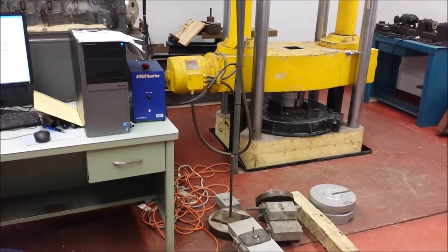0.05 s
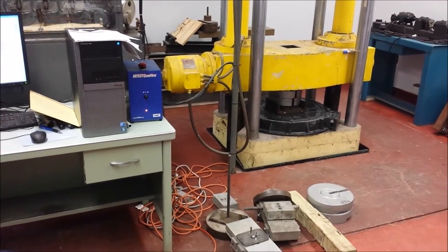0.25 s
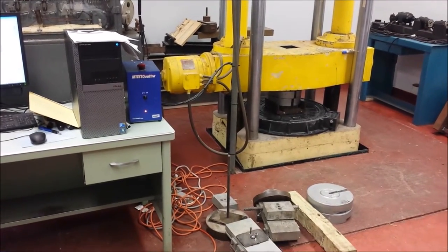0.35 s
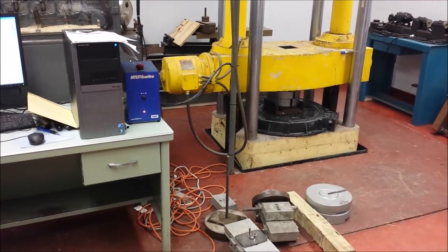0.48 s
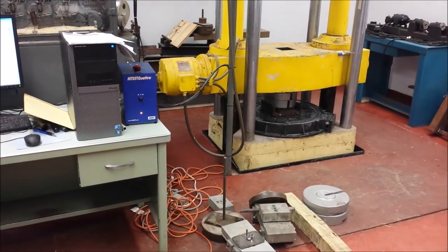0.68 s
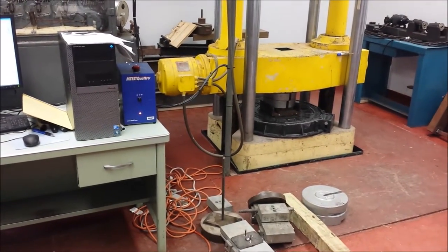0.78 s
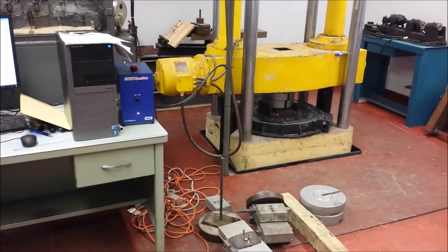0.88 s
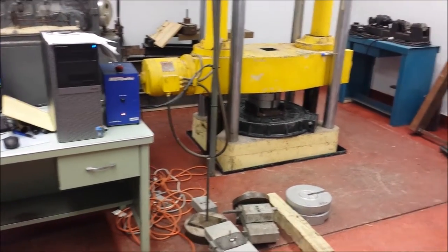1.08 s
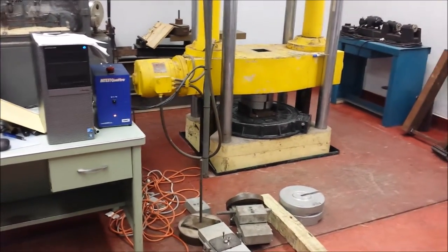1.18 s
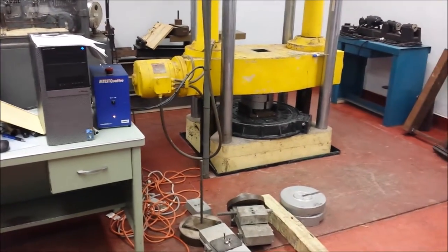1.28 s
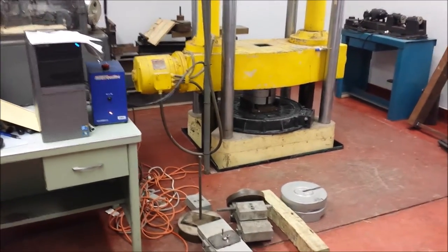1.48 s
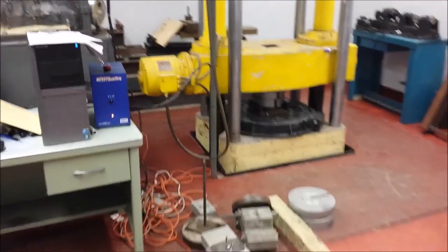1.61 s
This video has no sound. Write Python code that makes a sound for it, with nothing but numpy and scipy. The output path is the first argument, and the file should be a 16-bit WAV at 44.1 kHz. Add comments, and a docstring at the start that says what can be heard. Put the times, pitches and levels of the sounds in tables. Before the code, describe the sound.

One loud, sharp crack rings through an echoing workshop as a press breaks a brittle cover. Ticks, tearing and short squeaks lead up to it; afterwards a piece settles softly and light ticking continues over faint motors and fans.

```python
"""A cover gives way under a hydraulic press in a hard-walled workshop, where machines hum and hiss.
First the cover ticks, squeaks and tears under the load. Just before half a second it breaks with one
loud crack that sets cover and press ringing; the recorder rounds off the peak. Then the broken faces
squeak as they slip, a piece settles with a soft thud, and the ticking goes on to the end."""
import sys
import numpy as np
from scipy import signal
from scipy.fft import rfft, irfft, next_fast_len
from scipy.io import wavfile
from scipy.ndimage import map_coordinates

SR = 44100
rng = np.random.default_rng(int(sys.argv[2]) if len(sys.argv) > 2 else 0)


def generate_wav(signal):
    """Clip the signal to [-1, 1] and save it as 16-bit WAV at the path in sys.argv[1]."""
    frames = np.transpose(np.atleast_2d(signal))
    scaled = np.clip(frames, -1, 1) * 32767
    pcm = np.round(scaled).astype(np.int16)
    wavfile.write(sys.argv[1], SR, pcm)


N = 72765


def amp(db):
    """Turn decibels into a gain."""
    return 10 ** (np.asarray(db) / 20)


def unit(x):
    """Scale a sound to an average power of 1."""
    return x / np.sqrt(np.mean(x ** 2) + 1e-20)


def along(points, hz):
    """Read between the rows of a (Hz, value) table, on a pitch scale."""
    row_hz, values = np.transpose(points)
    return np.interp(np.log(hz + 1), np.log(row_hz + 1), values)


def rise(t, attack_s=0.00052):
    """A swell from silence; by default the nearly instant front of a crack."""
    return 1 - np.exp(-t / attack_s)


def fall(t, fade_s):
    """A dying away. A fade time is how long it takes to lose 60 dB."""
    return np.exp(-np.log(1000) * np.maximum(t, 0) / fade_s)


def pan(db):
    """Left and right gains. Pan is how many dB louder the left side is."""
    return amp(np.array([[db], [-db]]) / 2)


def wobble(rate, size=SR):
    """A smooth curve through `rate` random points a second."""
    points = rng.standard_normal(int(size * rate / SR) + 4)
    return map_coordinates(points, [np.arange(size) * rate / SR])


def add(out, start, x):
    """Mix x in from `start` seconds."""
    i = max(round(start * SR), 0)
    out[:, i:i + x.shape[-1]] += x[..., :N - i]


# How alike left and right sound. Each row: frequency in Hz, likeness (1 is the same, 0 unrelated).
LIKENESS = [(40, 0.31), (130, 0.98), (300, 0.84), (550, 0.78), (1000, 0.48), (2000, .1), (12000, 0)]
def stereo_angle(hz):
    """An angle that grows as left and right become less alike."""
    return np.arccos(np.clip(along(LIKENESS, hz), -1, 1)) / 2


# Which way the room's sound leans. Each row: frequency in Hz, pan in dB.
ROOM_PAN = [(60, 5), (250, 4.5), (900, 1.5), (1900, 4.5), (3000, 2), (5000, 0), (7500, -6.5), (12000, -21)]
def room_noise(colour, body_db=0, size=SR):
    """Noise as the room's echoes reach two microphones; body_db tilts it below about 1.5 kHz."""
    n = next_fast_len(size)
    hz = np.fft.rfftfreq(n, 1 / SR)
    angle = stereo_angle(hz)
    mid, side = rfft(rng.standard_normal((2, n))) * [np.cos(angle), np.sin(angle)]
    gain_db = along(colour, hz) + along([(1200, body_db), (2000, 0.0055)], hz)
    lean_db = np.outer([.5, -.5], along(ROOM_PAN, hz))
    spectrum = np.array([mid + side, mid - side]) * amp(gain_db + lean_db)
    return unit(irfft(spectrum, n)[:, :size])


# The motors' tones. Each row: pitch in Hz, level in dB.
MOTOR_TONES = [(120, -64), (253, -54), (387, -58.5), (770, -65.5), (1152, -66.5), (2153, -65)]
# The tone colour of the fans. Each row: frequency in Hz, relative level in dB.
FAN_COLOUR = [(15, -60), (25, -24), (189, -10), (260, -3), (563, -16), (735, -13.5), (934, -16),
              (1160, -13), (1250, -20.5), (2310, -12), (3260, -17), (5270, -13), (8070, -12.5),
              (12700, -40), (14500, -51)]
# How loud the fans are. Each row: time in seconds, level in dB.
FAN_LEVEL = [(0, -41), (.14, -41.5), (.7, -43.5), (1.2, -49.5), (1.65, -40)]
def machines(waver_db=2):
    """Motors hum, wavering in level and pitch, over the hiss of fans."""
    t = np.arange(N) / SR
    hum = np.zeros(N)
    for hz, db in MOTOR_TONES:
        level = amp(db + waver_db * wobble(10.12, N)) * np.sqrt(2)
        hum += level * np.sin(2 * np.pi * hz * t + wobble(9.85, N))
    fan_db = np.interp(t, *np.transpose(FAN_LEVEL))
    return pan(1.2) * hum + amp(fan_db) * room_noise(FAN_COLOUR, size=N)


def thud(start=.832, hz=131, db=-46):
    """A piece settles with one soft, low note on the right."""
    out, t = np.zeros((2, N)), np.arange(SR) / SR
    add(out, start, amp(db) * pan(-14) * np.sin(2 * np.pi * hz * t) * fall(t, fade_s=.09))
    return out


# The echo of the hard walls. Each row: frequency in Hz, fade time in seconds.
ROOM_FADE = [(60, 0.97), (170, 0.93), (400, 0.75), (1000, .56), (2000, 0.55), (4000, 0.6), (8000, 0.51),
             (13000, 0.38)]
def crack(colour, hold, body_db=0):
    """A crack fills the room for `hold` seconds; then each frequency dies at its own speed."""
    hz, t, spectrum = signal.stft(room_noise(colour, body_db), SR, nperseg=256)
    fading = fall(t - hold, along(ROOM_FADE, hz)[:, None])
    _, sound = signal.istft(spectrum * fading, SR)
    return sound[:, :SR] * rise(np.arange(SR) / SR)


# Small cracks. Each row: start in seconds, level in dB, low-end boost in dB, hold in seconds.
TICKS = [(.055, -53, -4, 0.025), (.092, -42.5, -8, 0.036), (.136, -38, -25, .01), (.15, -33, -15, .01),
         (.162, -25, -10.5, 0.0077), (.1795, -25.5, -10.5, 0.067), (.8466, -43, -0.5, .03),
         (.9444, -46.5, -3, .01), (1.06, -43.5, 4, 0.012), (1.0821, -50, -7, 0.012),
         (1.1195, -45, -12, 0.0046), (1.134, -68, -8, 0.0045), (1.2093, -47.5, -11, 0.032),
         (1.226, -44, 1, 0.018), (1.32, -43, 0.5, 0.027), (1.3644, -34, 5.5, 0.04), (1.49, -45, 12, 0.013),
         (1.5455, -40.5, 3.5, 0.062), (1.6214, -25.5, 4, 0.029)]
# Their tone colour. Each row: frequency in Hz, relative level in dB.
TICK_COLOUR = [(100, -38), (300, -22), (600, -6.5), (1100, -1.5), (1600, -1), (2100, 2.5), (3100, -2.5),
               (4200, 0), (5500, 1.5), (7700, 2.5), (10000, -13), (12500, -19), (15000, -41)]
def ticks():
    """The brittle cover gives in tiny cracks, before and after the break."""
    out = np.zeros((2, N))
    for start, db, body_db, hold in TICKS:
        add(out, start, amp(db) * crack(TICK_COLOUR, hold, body_db))
    return out


# Slips. Each row: start and length in seconds, first and last pitch in Hz, level and pan in dB.
SQUEAKS = [(0.165, 0.019, 2676, 2890, -32.5, 2), (0.174, 0.016, 1845, 1790, -34.5, 7),
           (0.1787, 0.00366, 7880, 7560, -19.5, -13), (0.236, 0.0189, 1498, 1846, -17.5, 5),
           (0.289, 0.012, 2080, 2230, -21, 11), (0.45, 0.0222, 1506, 1784, -18.5, 1),
           (0.479, 0.0274, 1768, 1827, -13, 9.5), (1.427, 0.048, 560, 580, -45, 1),
           (1.621, .026, 2014, 2154, -33.5, 2)]
def squeaks(roughness=0.5, echo_db=-1.5):
    """Broken faces slip on each other in short, rough, gliding tones, each with its echo."""
    out, echo_t = np.zeros((2, N)), np.arange(SR // 2) / SR
    for start, length, first_hz, last_hz, db, pan_db in SQUEAKS:
        n = int(length * SR)
        glide = 2 * np.pi * np.cumsum(np.linspace(first_hz, last_hz, n)) / SR
        phase = glide + roughness * wobble(595)[:n]
        tone = amp(db) * pan(pan_db) * np.sin(phase) * signal.windows.tukey(n, .2)
        room = rng.standard_normal((2, SR // 2)) * fall(echo_t, along(ROOM_FADE, last_hz))
        echo = signal.fftconvolve(tone, room / np.linalg.norm(room[0]), axes=1)
        add(out, start, tone)
        add(out, start, amp(echo_db) * echo)
    return out


# Sharp snaps. Each row: start in seconds, level in dB, pan in dB.
SNAPS = [(0.2367, -24, -14), (.449, -13.5, -16.5), (0.467, -21, -18), (0.8467, -38.5, -12),
         (1.3647, -40, -16)]
# Their tone colour. Each row: frequency in Hz, relative level in dB.
SNAP_COLOUR = [(500, -20), (3000, -10), (5000, 3.5), (7800, -4), (10000, 3), (14500, -10)]
def snaps():
    """The cover snaps in bright bursts, heard directly with no echo."""
    out, t = np.zeros((2, N)), np.arange(SR) / SR
    for start, db, pan_db in SNAPS:
        burst = unit(room_noise(SNAP_COLOUR)[0]) * fall(t, fade_s=0.025)
        add(out, start, amp(db) * pan(pan_db) * burst)
    return out


# The notes of cover and press. Each row: pitch in Hz, relative level in dB, fade time in seconds.
RING_NOTES = [(173.5, -16.5, 1.17), (392.3, -1, 0.59), (546.9, -8.5, 0.65), (747, -8, 0.49),
              (777, -11, 0.72), (848, -6, 0.37), (962, -9, 0.47), (1055, -5, .42), (1511, -7, 0.34),
              (1790, -2, 0.6), (1786, -9, 0.36), (1974, -6, 0.51), (2030, -13, 0.31), (2430, -14, 0.62)]
def ring(low_hz):
    """Cover and press ring at their own notes; those below low_hz are barely stirred."""
    out, t = np.zeros((2, SR)), np.arange(SR) / SR
    for hz, db, fade_s in RING_NOTES:
        angle = stereo_angle(hz)
        phase = 2 * np.pi * (hz * t + rng.random()) + 0.14 * wobble(26)
        level = amp(db) / (1 + (low_hz / hz) ** 4)
        out += level * np.sin(phase + np.array([[angle], [-angle]])) * fall(t, fade_s)
    return pan(1.5) * out * rise(t, attack_s=0.013)


# Tears. Each row: start in seconds, level in dB, low-end boost in dB, hold in seconds.
TEARS = [(0.2368, -21.5, 0.5, 0.024), (.26, -17.5, -10, 0.028), (0.275, -20, 4.5, 0.0091),
         (0.289, -14.5, -2, 0.018), (0.348, -18.5, 2.5, 0.012)]
# Their tone colour. Each row: frequency in Hz, relative level in dB.
TEAR_COLOUR = [(35, -85), (60, -48), (101, -28.5), (356, -12), (390, -6), (447, -19.5), (846, -2),
               (906, -7), (1020, -0.5), (1370, -11), (1680, -10.5), (1840, -1.5), (3110, -12.5),
               (7220, -9.5), (11700, -32), (12800, -49), (14000, -69)]
def tears(ring_db=-5.5):
    """The cover tears before it breaks, and each tear sets cover and press ringing."""
    out = np.zeros((2, N))
    for start, db, body_db, hold in TEARS:
        add(out, start, amp(db) * crack(TEAR_COLOUR, hold, body_db))
    for start, db, body_db, _ in TEARS:
        add(out, start, amp(db + body_db + ring_db) * ring(low_hz=427))
    return out


# The break's first knock. Each row: pitch in Hz, rough width in Hz, relative level in dB.
KNOCK_TONES = [(403, 135, -12), (555, 49, -7), (730, 34, -10), (1070, 120, 3.5), (1520, 120, 1),
               (1790, 97, -4), (2050, 150, -3)]
# The tone colour of the break. Each row: frequency in Hz, relative level in dB.
BREAK_COLOUR = [(18, -68), (30, -46), (118, -20.5), (161, -15), (270, -15.5), (388, -4.5), (442, -6.5),
                (668, -8), (760, 1), (935, -8), (1060, -0.5), (1340, -11.5), (1530, -1), (1650, -6),
                (1830, -1), (2920, -12.5), (8210, -15.5), (13100, -57), (14500, -76)]
def fracture(start=.448):
    """The cover breaks: a blast (the first wave of sound), a knock, an echoing crack and a long ring."""
    out, t = np.zeros((2, N)), np.arange(SR) / SR
    tones = sum(amp(db) * np.sin(2 * np.pi * (hz * t + rng.random()) + wobble(width))
                for hz, width, db in KNOCK_TONES)
    knock = amp(-7.5) * unit(tones) * fall(t, fade_s=0.11)
    echo = amp(-7) * crack(BREAK_COLOUR, hold=0.0082)
    blast = amp(-5) * room_noise(BREAK_COLOUR) * fall(t, fade_s=0.051)
    ringing = amp(-12) * ring(low_hz=0)
    add(out, start, (blast + knock) * rise(t) + echo + ringing)
    return out


def scene():
    """Mix everything; the smaller cracks lose their bass below 186 Hz."""
    bass_cut = signal.butter(4, 186, "high", fs=SR, output="sos")
    cracking = signal.sosfilt(bass_cut, ticks() + tears() + snaps())
    return cracking + fracture() + squeaks() + thud() + machines()


def record(dry, ceiling=.97, hardness=5, top_hz=14800):
    """The recorder rounds off the highest peaks and cuts the very highest treble."""
    rounded = dry / (1 + np.abs(dry / ceiling) ** hardness) ** (1 / hardness)
    n = next_fast_len(N + SR // 2)
    hz = np.fft.rfftfreq(n, 1 / SR)
    treble_cut = np.clip((top_hz - hz) / 600 + .5, 0, 1)
    return irfft(rfft(rounded, n) * treble_cut, n)[:, :N]


dry = scene()
out = record(dry)
generate_wav(out)
```